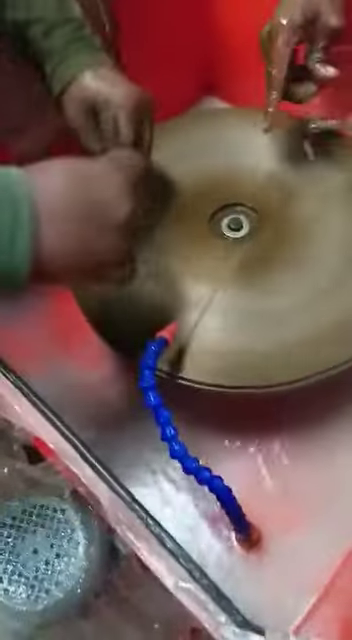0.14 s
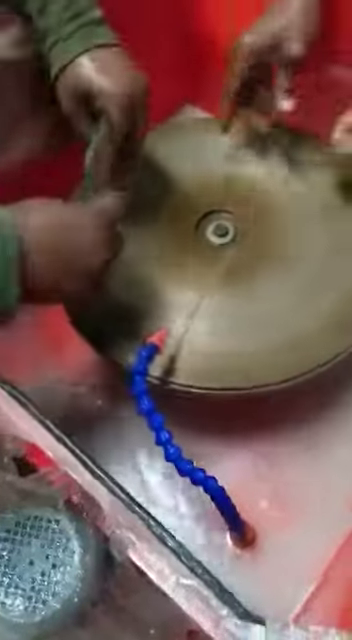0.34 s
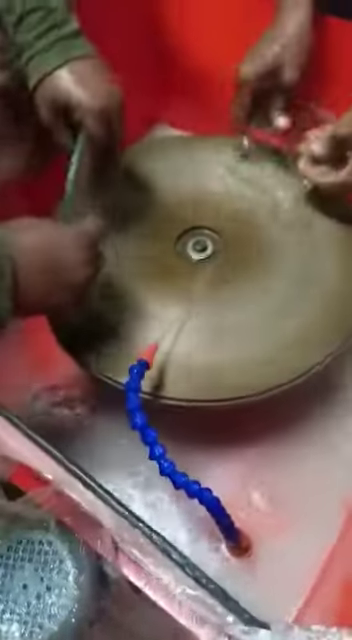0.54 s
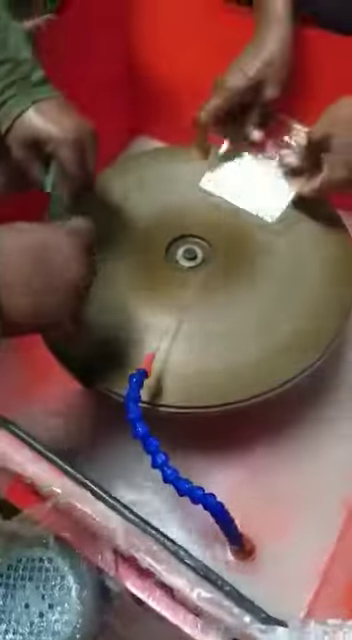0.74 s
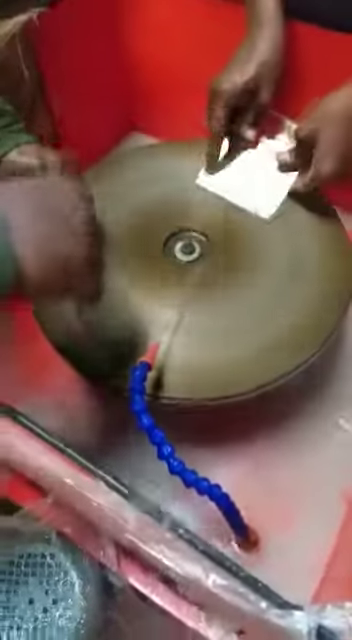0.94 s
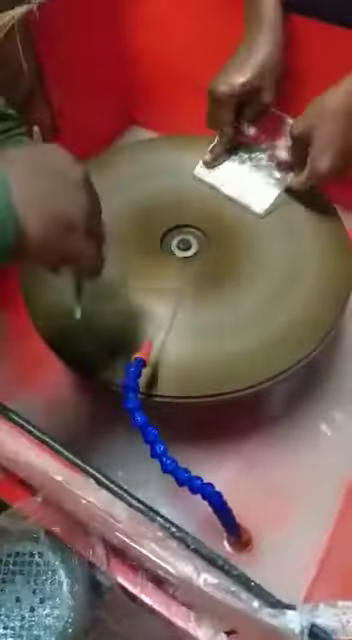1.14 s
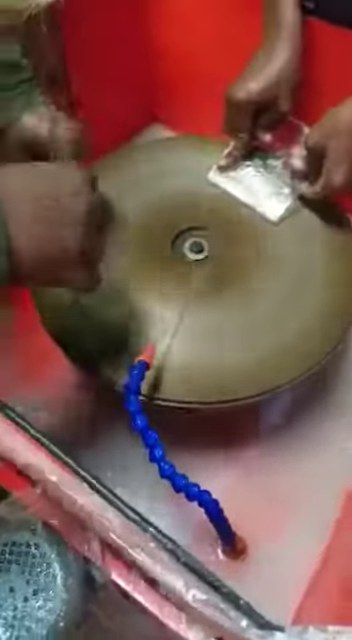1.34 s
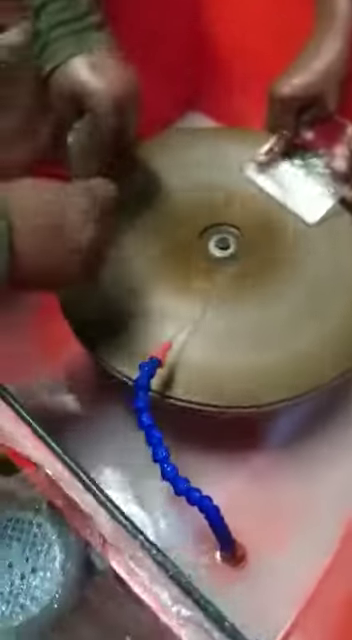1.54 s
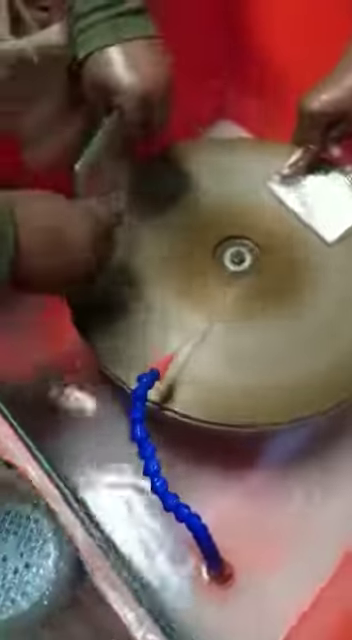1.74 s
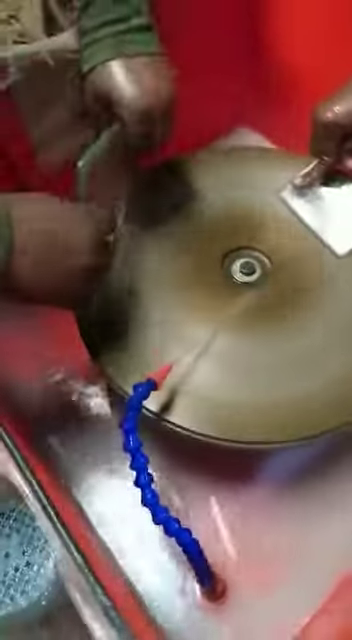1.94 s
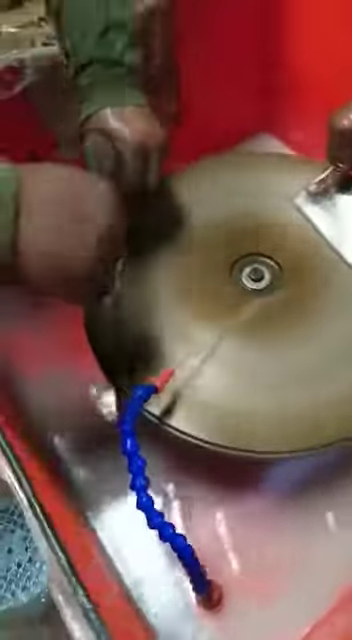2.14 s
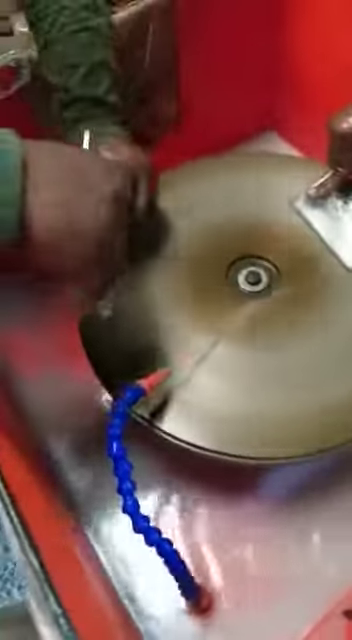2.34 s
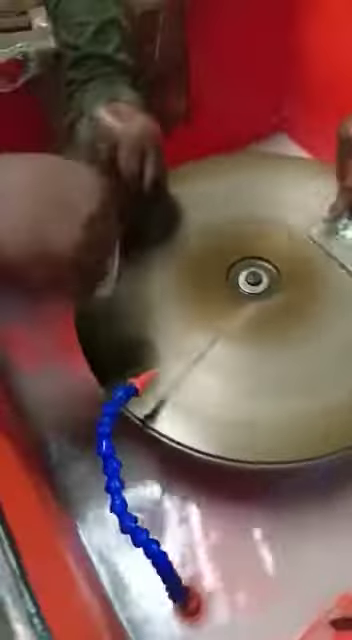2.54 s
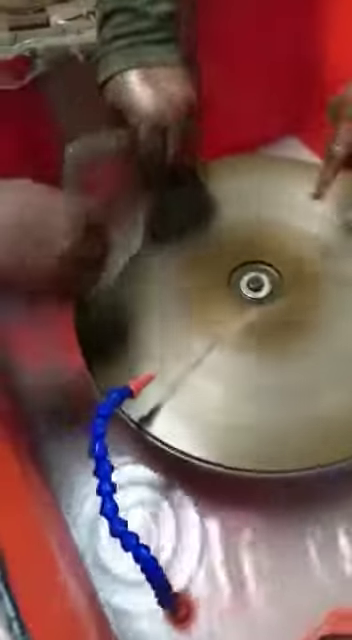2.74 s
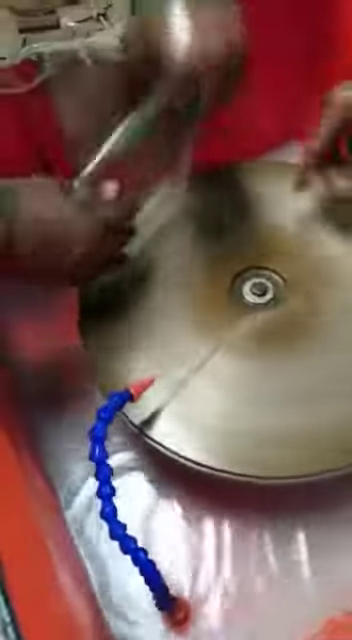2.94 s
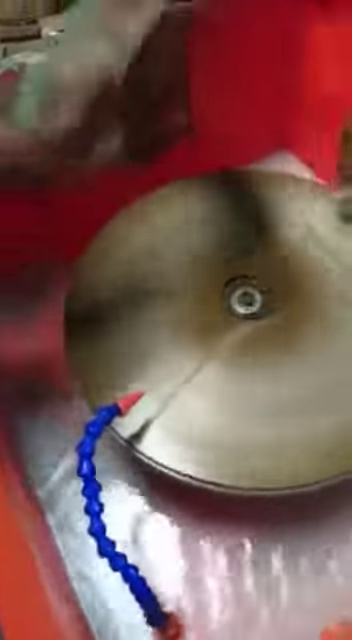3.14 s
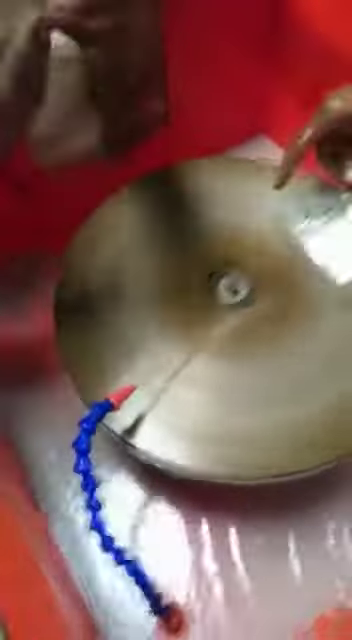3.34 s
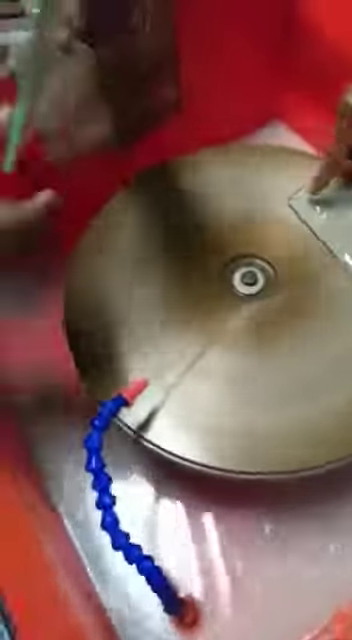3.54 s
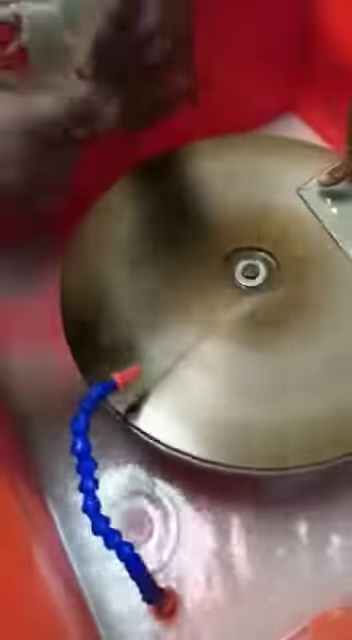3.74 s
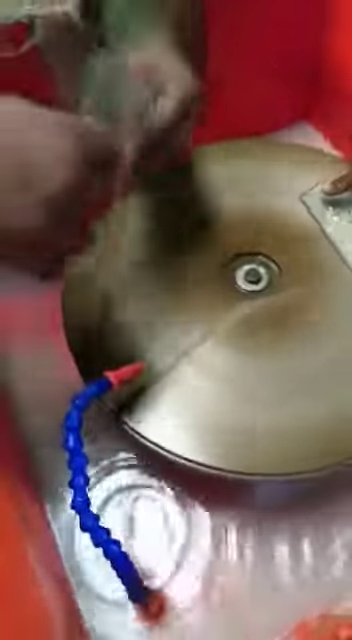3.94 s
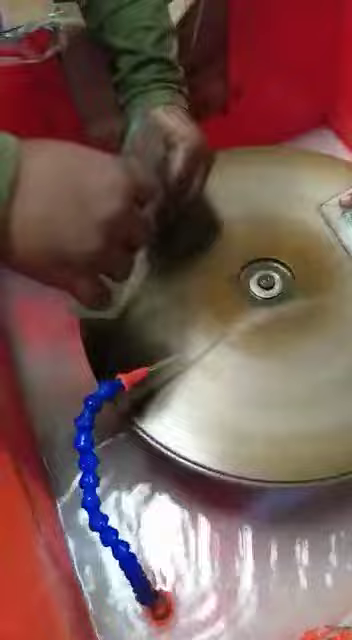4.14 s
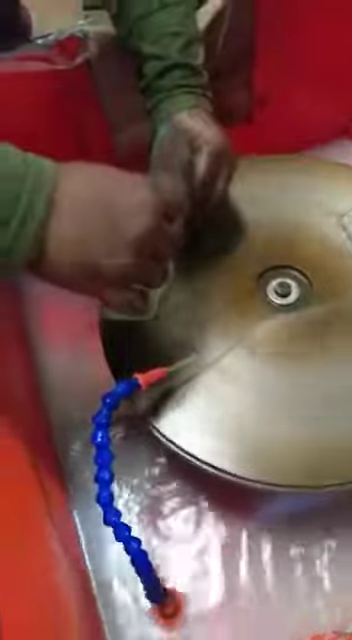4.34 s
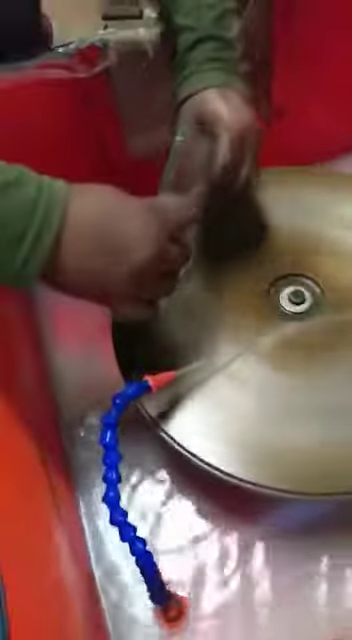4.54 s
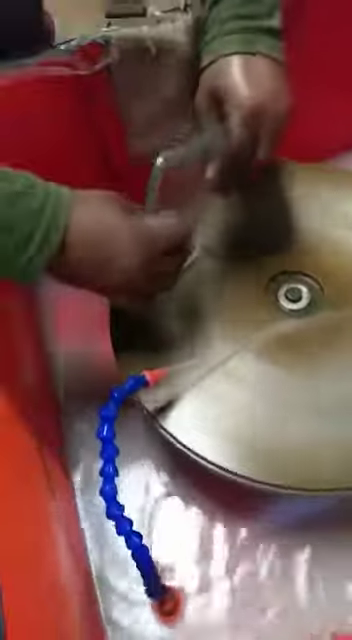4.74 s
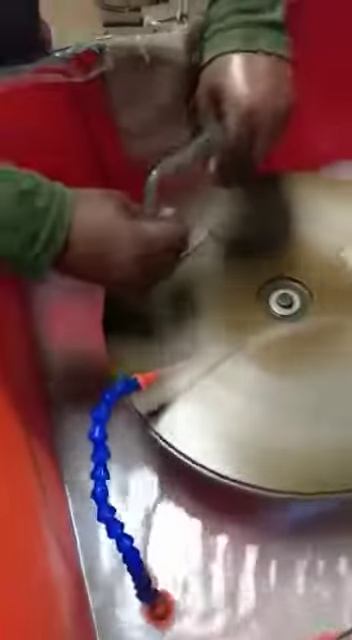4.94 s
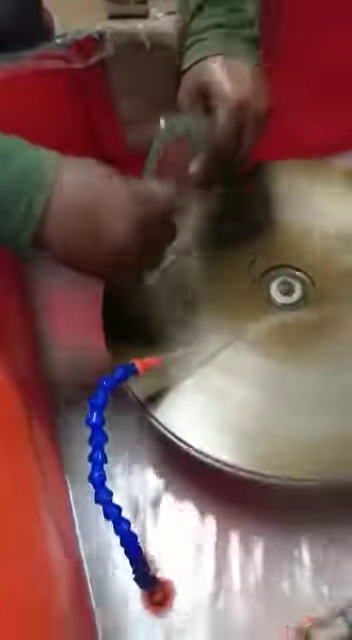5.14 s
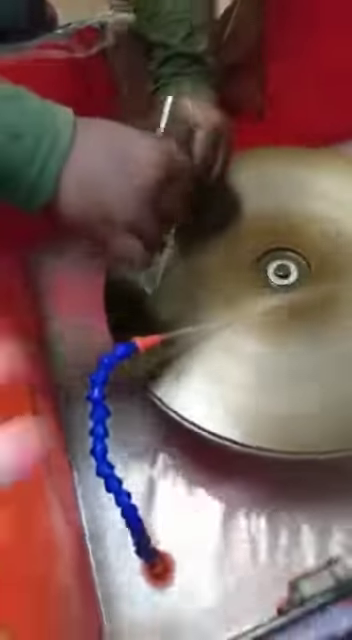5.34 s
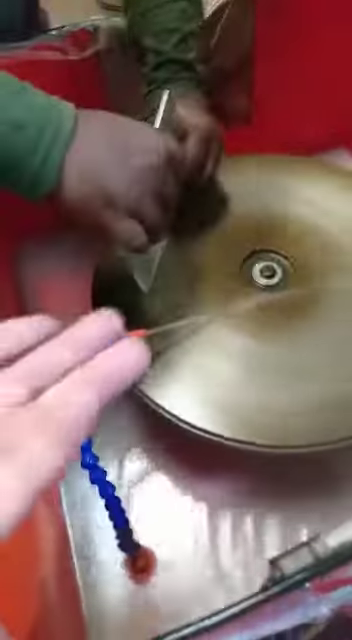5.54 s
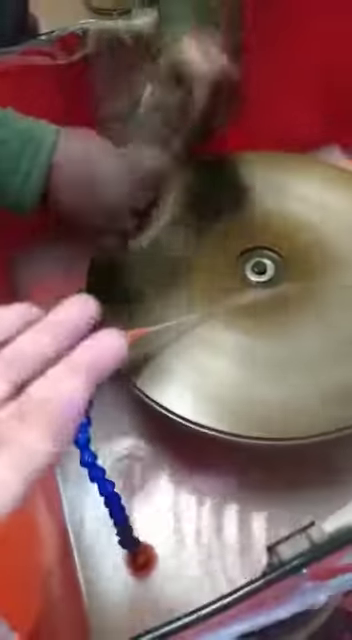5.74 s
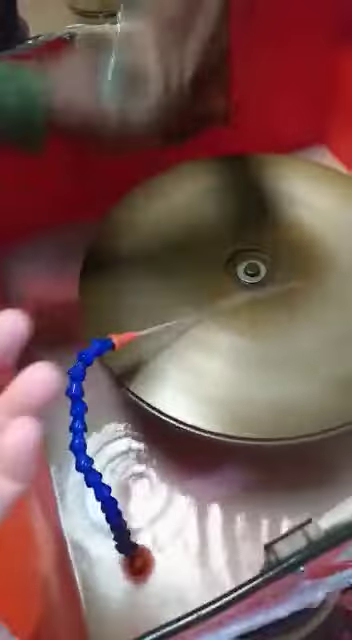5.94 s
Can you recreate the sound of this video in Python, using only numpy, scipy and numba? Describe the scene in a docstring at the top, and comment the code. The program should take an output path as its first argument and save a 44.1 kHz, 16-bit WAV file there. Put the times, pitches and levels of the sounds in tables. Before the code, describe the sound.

On a wet rotating abrasive plate, a glass pane scrapes with bright, ringing chatter while a block lands abruptly and grinds with dense, rising rasp and brief squeals. A short pause exposes low hum, rumble and water ticks before both grind again. The microphone is close, the bass thin and loud peaks held down, with a short dull indoor echo.

```python
"""Glass grinds on a wet, spinning diamond plate in a workshop: a pane held on its edge chatters and rings,
and a block pressed flat gives a harsher, louder rasp. Random grit forces drive the resonances of each piece;
most of the block's resonances rise as it seats. Short squeals, spitting water (bursts of noise),
a humming motor (steady tones) and a rumble (filtered noise) join in, with a little room echo on the glass."""
import sys
import numpy as np
from scipy import signal
from scipy.fft import rfft, irfft, next_fast_len
from scipy.io import wavfile
from scipy.ndimage import uniform_filter1d, minimum_filter1d
from numba import njit

SR = 44100
rng = np.random.default_rng(int(sys.argv[2]) if len(sys.argv) > 2 else 0)


def dump_mix(stems):
    """Bounce the given channels to the path in sys.argv[1] as a 16-bit WAV at rate SR."""
    frames = np.atleast_2d(stems).T  # one column per channel
    limited = np.clip(frames, -1, 1)  # hard clip at full scale
    pcm = np.round(limited * 32767).astype(np.int16)
    wavfile.write(sys.argv[1], SR, pcm)


N = 264144
TIME = np.arange(N) / SR   # seconds

# The pane's ringing modes: (pitch [Hz], width before scaling [Hz], level in first pass [dB],
# level in second pass [dB], level change with contact place [dB per unit])
PANE_MODES = [(377, 33, -21, -24, -6), (1177, 98, -16, -21.5, -3), (1379, 50, -24, -19, 0),
              (2155, 101, -3.5, -4, 5.5), (2460, 88, -8.5, -11.5, -0.5), (2634, 180, -7.5, -6.5, 0),
              (2710, 240, -18, -6, 4), (2975, 90, -12.5, -3.5, 1.5), (4082, 204, -8.5, -8.5, -1.5),
              (4260, 830, -28, -20, -8), (5125, 250, -11.5, -14.5, 0.5), (5726, 240, -16, -21.5, -1.5),
              (6650, 160, -17.5, -12, 1.5), (7870, 170, -22, -21.5, -1), (9180, 180, -15, -21, -1.5),
              (10940, 200, -29.5, -33, 1), (11620, 260, -19, -23, -0.5), (12700, 170, -33, -27, 0),
              (13650, 310, -23.5, -27, -2), (15600, 250, -40, -34, 2)]
# Scrape heard between those modes: (frequency [Hz], level [dB])
PANE_SCRAPE = [(30, -75), (120, -45), (250, -33.5), (420, -23.5), (650, -27), (1000, -28), (1600, -31),
               (2200, -17), (3600, -23.5), (6000, -29), (8400, -31.5), (10000, -38.5), (12000, -34),
               (16000, -44)]
# The edge catches hard and knocks on the plate: (time [s], level before a boost [dB])
PANE_KNOCKS = [(0.393, 4), (0.5315, 2), (0.618, 5), (5.387, -1), (5.4176, 3), (5.635, 8), (5.684, 2)]
SECOND_PASS_S = 3.3   # the second set of mode levels takes over here
# lighter catches at random, relative to the push and before the same boost
PANE_CATCHES_PER_S, PANE_CATCH_DB, PANE_CATCH_SPREAD_DB = 22, -6.5, 5.5


def pane():
    """The edge bounces on the grit; where it touches decides which bending mode rings most."""
    push, bright, place = pane_motion()
    press = push * flutter(depth_db=1.3, rate=300)
    bounce = flutter(depth_db=1.8, rate=120)
    jolts = bursts(PANE_KNOCKS, decay_s=0.004)
    catches = scattered(PANE_CATCHES_PER_S, PANE_CATCH_DB, PANE_CATCH_SPREAD_DB)
    knocks = from_db(5.0) * (jolts + push * bursts(catches, decay_s=0.0018))
    out = colour(grit(coarse=0.51) * press * np.sqrt(bounce), PANE_SCRAPE)
    for hz, width, first_db, second_db, place_db in PANE_MODES:
        octaves = np.log2(hz / 4000)
        # bounces and knocks are soft blows: they reach mostly the low modes
        reach = 1 / np.sqrt(1 + (hz / 4500) ** 2)
        steady_force = press * bounce ** reach * from_db(bright * octaves)
        force = steady_force + knocks * reach ** 2
        pass_db = np.where(TIME < SECOND_PASS_S, first_db, second_db)
        mode_db = pass_db + place_db * place
        # the grip shifts in the hand: each mode swells and wanders on its own
        force = force * flutter(depth_db=1.78, rate=10.7)
        wander = 0.07 * width * drift(4)
        drive = grit(coarse=0.75) * force * from_db(mode_db)
        out += resonance(drive, hz + wander, 0.7 * width)
    return out


# The pane's edge is on the plate: (start [s], end [s], time to lower it [s], level [dB],
# brightness before dulling [dB per octave])
PANE_PASSES = [(-.12, 2.912, 0.27, -1.5, 0.24), (4.15, 5.81, 0.36, -2, 1)]
# The hand rocks the pane in strokes: (middle [s], length [s], extra push [dB],
# travel of the contact along the edge [place units])
PANE_STROKES = [(0.575, 0.57, 3.5, 1.3), (0.94, .14, -1, -0.25), (1.348, 0.62, 1.5, 0.046),
                (1.71, 0.3, 5, 1.14), (2, .24, 5, 1.25), (2.406, 0.52, -1, -0.68), (2.796, 0.2, 2, 0.84),
                (4.52, 0.38, 1, 0.27), (5.052, 0.46, 3, -0.33), (5.236, 0.084, -4, 0.24),
                (5.437, 0.38, 2, 1.1), (5.698, 0.15, 3, 0.68)]
REST_PLACE = -0.61   # where the edge touches between strokes: -1 is the corner, 1 the middle
STROKE_ROUNDNESS = 0.29   # smaller = a stroke holds its top for longer
PANE_RELEASE_S = 0.015
PANE_DULLING = 0.058   # dB per octave of brightness lost for each dB of push


def pane_motion():
    """A harder push dulls the sound; each stroke rolls the contact along the edge: (force, brightness, place)."""
    push_db, place = 0, REST_PLACE
    for s, length, db, travel in PANE_STROKES:
        stroke = swell(s, length) ** STROKE_ROUNDNESS
        push_db = push_db + db * stroke
        place = place + travel * stroke
    force, bright = 0, 0
    for start, end, lower_s, level_db, tilt in PANE_PASSES:
        touch = contact(start, end, lower_s, PANE_RELEASE_S)
        total_db = level_db + push_db
        force = force + touch * from_db(total_db)
        bright = bright + (touch > 0) * (tilt - PANE_DULLING * total_db)
    return force, bright, place


# The block's modes in each of two grips: (pitch lying flat [Hz], width before scaling [Hz], level [dB],
# share of the pitch lost when lifted [0..1, negative = gained], level gained when lifted [dB])
FIRST_GRIP_MODES = [(1310, 216, -21.5, 0.26, 1), (1750, 460, -27, 0.018, 13.5),
                    (2510, 224, -11, 0.014, 7.5), (3204, 290, -5.5, 0.065, -2), (4030, 394, -1, 0.051, 2),
                    (4265, 206, 6, 0.041, -30), (4620, 430, -17, 0.035, 11), (6270, 230, -3.5, 0.043, -12),
                    (6875, 270, -5.5, 0.0028, 5), (7590, 690, -7.5, 0.108, -2.5),
                    (8390, 180, -10, 0.056, 2.5), (10870, 450, -9, 0.063, -17),
                    (11300, 600, -15.5, 0.0023, -7.5), (12830, 1100, -23.5, 0.107, 6.5),
                    (14900, 390, -22, 0.037, 4)]
SECOND_GRIP_MODES = [(1237, 83, -6.5, 0.052, -5.5), (1360, 215, -11.5, 0.37, -5.5),
                     (2395, 304, -5.5, 0.1, 0.5), (3247, 220, -4, 0.174, 2), (3934, 293, -1.5, 0.087, 0.5),
                     (4283, 248, 0.5, 0.081, 7), (5570, 990, -41.5, 0.077, 25), (6340, 340, -14, 0.11, -9),
                     (6780, 470, -16, 0.052, 3), (7170, 470, -13, 0.033, 7.5),
                     (8100, 326, -12.5, 0.0018, 5), (10630, 650, -20.5, -0.033, 4.5),
                     (11430, 460, -20, 0.19, -8), (12790, 270, -16.5, 0.0017, 3.5),
                     (13500, 450, -30, -.015, 2), (15200, 300, -24, 0, -3)]
# Rasp of the grit under the block: (frequency [Hz], level [dB])
BLOCK_RASP = [(30, -80), (200, -71), (600, -44), (1000, -40), (1600, -26.5), (2200, -18), (3500, -18.5),
              (4700, -15.5), (5500, -22), (7500, -16.5), (9500, -23.5), (12000, -19.5), (16000, -32)]


def block(one_pass, modes):
    """As the face seats, the contact stiffens and damps: most modes rise, all widen, and the rasp fills in."""
    push, bright, lift = block_motion(*one_pass)
    press = push * flutter(depth_db=0.46, rate=78) * block_catches()
    out = colour(grit(coarse=0.86) * press * from_db(-5 * lift), BLOCK_RASP)
    damping = 1 - 0.14 * np.clip(lift, 0, 1) ** 2
    for hz, width, mode_db, sag, lift_db in modes:
        octaves = np.log2(hz / 4000)
        level_db = mode_db + lift_db * lift + bright * octaves
        force = press * from_db(level_db) / np.sqrt(damping)
        # the face rocks on the water film, so each mode comes and goes and wavers in pitch
        force = force * flutter(depth_db=1.06, rate=5.3)
        wander = 0.19 * width * drift(26)
        pitch = hz * (1 - sag * lift) + wander
        out += resonance(grit(coarse=0.82) * force, pitch, 0.82 * width * damping)
    return out


# The block is on the plate: (start [s], end [s], first touch [dB], full push [dB], seating time [s],
# brightness before dulling [dB per octave])
BLOCK_PASSES = [(0.974, 2.597, -9, 5.5, 0.5, -0.2), (3.5587, 5.071, -6, 4, 0.11, 2)]
PUSH_S, EASE_DB_PER_S = 0.2, 4.5   # the hand leans in, then slowly eases off
CORNER_S = 0.13   # the block rides on a corner this long before it begins to seat
TIP_S, TIP_LIFT = 0.13, 0.88   # at the end it is tipped up again (0 flat, 1 on a corner)
BLOCK_ATTACK_S, BLOCK_RELEASE_S = 0.00093, 0.062
LANDING_DB, LANDING_S = 4.5, 0.004   # the bump as it meets the plate
BLOCK_DULLING = 0.47   # dB per octave of brightness lost for each dB of push


def block_motion(start, end, touch_db, full_db, seat_s, tilt):
    """The block lands on a corner, is pushed flat, eased off and tipped away: (force, brightness, lift)."""
    age = np.clip(TIME - start, 0, end - start)
    lean_db = (full_db - touch_db) * np.minimum(age / PUSH_S, 1)
    ease_db = EASE_DB_PER_S * np.maximum(age - PUSH_S, 0)
    push_db = touch_db + lean_db - ease_db
    seating = np.exp(-np.maximum(age - CORNER_S, 0) / seat_s)
    tipping = TIP_LIFT * np.clip(1 - (end - TIME) / TIP_S, 0, 1)
    bump_db = LANDING_DB * np.exp(-age / LANDING_S)
    touch = contact(start, end, BLOCK_ATTACK_S, BLOCK_RELEASE_S)
    force = touch * from_db(push_db + bump_db)
    return force, tilt - BLOCK_DULLING * push_db, seating + tipping


# levels are set before the mean power is evened out
BLOCK_CATCHES_PER_S, BLOCK_CATCH_DB, BLOCK_CATCH_SPREAD_DB = 110, -4.5, 0.5


def block_catches():
    """Random small catches of the grit: the force jumps and dies away; mean power 1."""
    catches = scattered(BLOCK_CATCHES_PER_S, BLOCK_CATCH_DB, BLOCK_CATCH_SPREAD_DB)
    gain = 1.5 + bursts(catches, decay_s=0.0031)   # 1.5 is the steady part
    return gain / np.sqrt(np.mean(gain ** 2))


# The glass sticks and slips on one mode for a moment: (middle [s], length [s], pitch [Hz],
# drive level [dB])
SQUEALS = [(1.09, 0.26, 3644, 6.5), (1.185, 0.16, 2460, 8), (1.98, 0.16, 5000, -3),
           (2.535, 0.54, 2680, 0.5), (3.56, 0.13, 2705, 3.5), (5.04, 0.44, 5110, -3.5),
           (5.268, 0.11, 5780, -9)]


def squeals():
    """A narrow ring swells and fades, driven only while a piece is on the plate."""
    passes = PANE_PASSES + BLOCK_PASSES
    touching = sum((TIME > start) & (TIME < end) for start, end, *_ in passes) > 0
    out = 0
    for s, length, hz, db in SQUEALS:
        drive = grit(coarse=0.25) * swell(s, length) * touching * from_db(db)
        out = out + resonance(drive, hz, width=90)
    return out


# The loudest spits of water on the plate: (time [s], level before a cut [dB])
SPITS = [(3.0074, -23), (3.1349, -29), (3.2312, -32), (3.3918, -31), (3.4218, -33)]
SPITS_PER_S, SPIT_DB, SPIT_SPREAD_DB = 12, -39, 5   # small ones at random, before the same cut


def water():
    """Drops flung off the plate burst in short, bright ticks of noise."""
    drops = np.vstack([SPITS, scattered(SPITS_PER_S, SPIT_DB, SPIT_SPREAD_DB)])
    spray = bursts(drops, decay_s=0.0051) * rng.standard_normal(N)
    highpass = signal.butter(2, min(9000, SR / 3), "high", fs=SR, output="sos")
    return from_db(-8) * signal.sosfilt(highpass, spray)


# Motor and drive tones: (pitch [Hz], level [dB rms])
HUM = [(166.0, -45.5), (297.0, -56), (497.0, -58), (662.1, -53.5), (829.0, -61)]
# Machine rumble and running water: (frequency [Hz], level [dB])
MACHINE = [(30, -52), (55, -49), (90, -38), (125, -26), (160, -24.5), (210, -19), (260, -31.5), (380, -28),
           (560, -34), (1400, -38), (2300, -36), (4300, -39.5), (7000, -50), (16000, -54)]
# The low rumble swells: (middle [s], length [s], level [dB])
SHUDDERS = [(1.553, 0.17, -37), (4.37, 0.15, -38)]
RUMBLE_DB = -50.5   # between swells


def machine():
    """Steady drive tones over the rumble of the housing and the hiss of water."""
    turns = np.cumsum(1 + 0.002 * drift(4)) / SR   # all the tones waver in pitch together
    hum = 0
    for hz, db in HUM:
        waver = flutter(depth_db=1.2, rate=8)
        tone = np.sqrt(2) * np.sin(2 * np.pi * (hz * turns + rng.random()))
        hum = hum + from_db(db) * waver * tone
    shudder = resonance(rng.standard_normal(N), hz=171, width=46)
    swells = sum(from_db(db) * swell(s, length) for s, length, db in SHUDDERS)
    shudder = shudder / shudder.std() * (from_db(RUMBLE_DB) + swells)
    return hum + shudder + colour(rng.standard_normal(N), MACHINE)


def workshop(x, t60, wall_hz):
    """Dense reflections from the trough and walls, duller than the source and dying away."""
    t = np.arange(SR // 2) / SR
    echoes = rng.standard_normal(len(t)) * from_db(-60 * t / t60) * (t > 0.003)
    lowpass = signal.butter(1, min(wall_hz, SR / 3), fs=SR, output="sos")
    echoes = signal.sosfilt(lowpass, echoes)
    return signal.fftconvolve(x, echoes / np.linalg.norm(echoes))[:N]


def from_db(db):
    """Decibels to gain."""
    return 10 ** (np.asarray(db) / 20)


def grit(coarse):
    """Countless diamond grains bite the glass, each with its own force, up to that of the largest grain."""
    size = np.minimum(rng.standard_normal(N), 2.6)
    force = rng.standard_normal(N) * np.exp(coarse * size)
    return force / force.std()


@njit
def two_poles(x, turn, loss):
    """Two damped rotations in series, with an angle and a loss per sample."""
    out, a, b, pole, r = np.zeros(len(x)), 0j, 0j, 0j, 0.
    for i in range(len(x)):
        if i % 32 == 0:   # follow the moving settings every 32 samples
            r = np.exp(-loss[i])
            pole = r * np.exp(1j * turn[i])
        a = pole * a + (1 - r) * x[i]
        b = pole * b + (1 - r) * a
        out[i] = 2 * b.real
    return out


def resonance(x, hz, width):
    """A steep resonance with gain 1 on top; its centre and width [Hz] may move."""
    step = np.full(N, np.pi / SR)
    loss = np.abs(width) * step / np.sqrt(np.sqrt(2) - 1)
    return two_poles(x, 2 * hz * step, loss)


def colour(x, spectrum):
    """Shape a sound by points of (frequency [Hz], level [dB])."""
    hz, db = np.transpose(spectrum)
    size = next_fast_len(N)
    bins = np.maximum(np.fft.rfftfreq(size, 1 / SR), 1)
    gain = from_db(np.interp(np.log(bins), np.log(hz), db))
    return irfft(rfft(x, size) * gain, size)[:N]


def drift(rate):
    """Slow random wandering with spread 1, drawn at every 16th sample; rate [Hz] sets its speed."""
    hop = 16
    size = next_fast_len(N // hop + 2)
    hz = np.fft.rfftfreq(size, hop / SR)
    slow = irfft(rfft(rng.standard_normal(size)) / (1 + (hz / rate) ** 2), size)
    return np.interp(np.arange(N) / hop, np.arange(size), slow / slow.std())


def flutter(depth_db, rate):
    """An unsteady gain with mean power 1."""
    gain = from_db(depth_db * drift(rate))
    return gain / np.sqrt(np.mean(gain ** 2))


def scattered(per_s, level_db, spread_db):
    """Events at random moments, as rows of (time [s], level [dB])."""
    born = rng.random(N - 1) < per_s / SR
    db = level_db + spread_db * rng.standard_normal(N - 1)
    return np.column_stack([TIME[:-1][born], db[born]])


def bursts(events, decay_s):
    """An envelope that jumps at each event and dies away."""
    s, db = np.transpose(events)
    kicks = np.zeros(N)
    kicks[np.round(s * SR).astype(int)] = from_db(db)
    return signal.lfilter([1], [1, -np.exp(-1 / (decay_s * SR))], kicks + 1e-18)


def contact(start, end, attack_s, release_s):
    """Attack, hold and release of a touch, 0..1."""
    return np.clip(np.minimum((TIME - start) / attack_s, (end - TIME) / release_s), 0, 1)


def swell(middle, length):
    """A smooth rise and fall, 0..1."""
    return np.cos(np.pi * np.clip((TIME - middle) / length, -0.5, 0.5))


def limiter(x, ceiling_db, release_db_per_s):
    """The gain ducks just ahead of each peak and climbs back."""
    over_db = np.maximum(20 * np.log10(np.abs(x).max(axis=0) + 1e-9) - ceiling_db, 0)
    ramp = release_db_per_s * TIME
    duck_db = np.maximum.accumulate(over_db + ramp) - ramp
    early_db = minimum_filter1d(-duck_db, size=45)
    return x * from_db(uniform_filter1d(early_db, size=45))


# A faint stereo difference in the glass, strongest near 1.7 and 9.7 kHz: (frequency [Hz], side level [dB])
GLASS_SIDE = [(950, -60), (1250, -76), (1750, -13), (2400, -19.5), (4100, -32), (6000, -67), (8000, -51),
              (9700, -8), (11500, -48), (14000, -55)]


def scene():
    """Both pieces on the plate, the room and the machine, almost centred in stereo."""
    first_block = block(BLOCK_PASSES[0], FIRST_GRIP_MODES)
    second_block = block(BLOCK_PASSES[1], SECOND_GRIP_MODES)
    glass = pane() + first_block + second_block + squeals()
    glass = glass + from_db(-14) * workshop(glass, t60=0.28, wall_hz=7200)
    side = colour(np.roll(glass, 3), GLASS_SIDE)   # 3 samples late
    return glass + side * [[1], [-1]] + machine() + water()


def record(dry):
    """The microphone sheds the deep bass, a limiter holds the peaks and the top is cut."""
    thin = signal.sosfilt(signal.butter(2, 85, "high", fs=SR, output="sos"), dry)
    held = limiter(thin, ceiling_db=-0.66, release_db_per_s=252)
    lowpass = signal.firwin(601, 15750, window=("kaiser", 9), fs=SR)   # cutoff in Hz
    return signal.fftconvolve(held, lowpass[None], mode="same", axes=1)


dry = scene()
out = record(dry)
dump_mix(out)
```